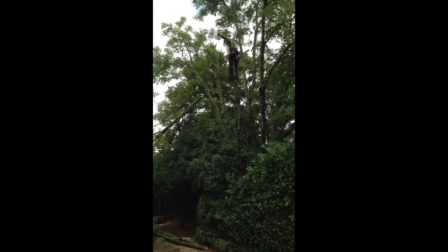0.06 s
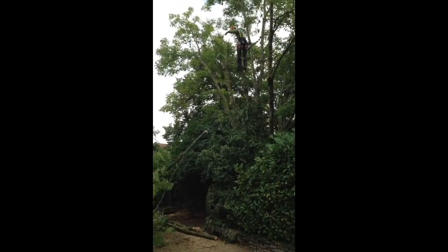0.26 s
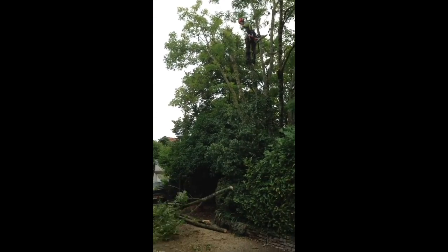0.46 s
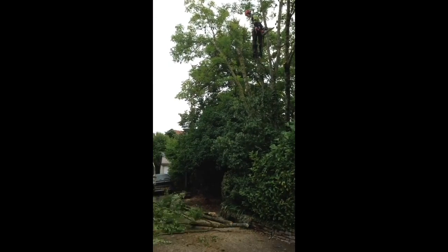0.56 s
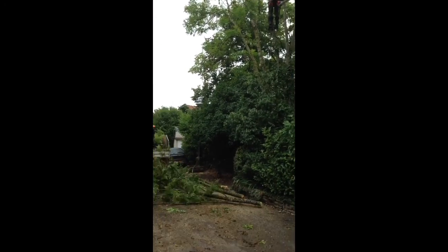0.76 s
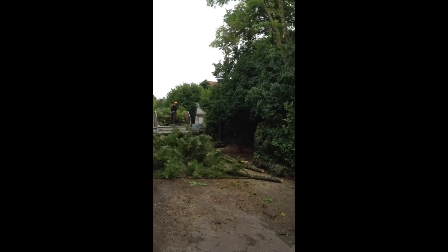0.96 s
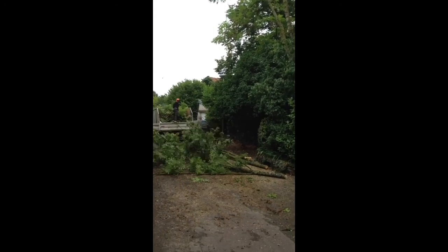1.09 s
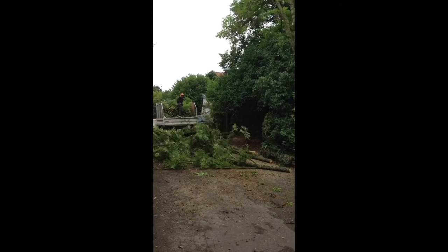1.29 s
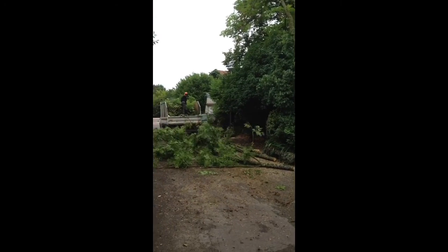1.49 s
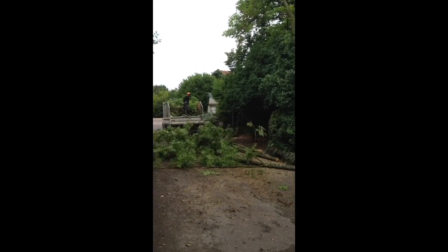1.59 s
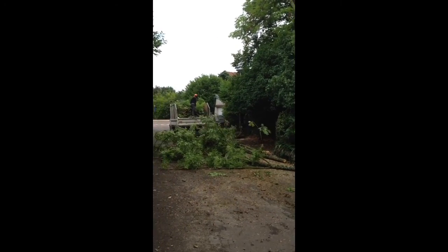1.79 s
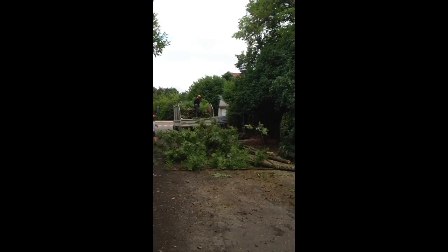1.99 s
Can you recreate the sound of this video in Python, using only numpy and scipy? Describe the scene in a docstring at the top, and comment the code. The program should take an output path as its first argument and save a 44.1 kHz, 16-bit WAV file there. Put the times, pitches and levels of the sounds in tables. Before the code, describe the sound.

Outdoors among trees, a falling branch rushes through leaves with sharp twig snaps and lands with a woody knock and slight echo. The rustle settles, leaving a quiet idling engine and a string of short, faint squeaks.

```python
"""Leaves swish over an idling engine as a cut branch crashes into foliage, a sum of countless tiny impacts.
Twigs fracture with sharp cracks; then the heavy butt strikes the ground, rings in its damped modes,
thuds, rebounds and shakes the leaves again. The engine's periodic firing gives a putter of harmonics,
with hiss and valve clatter, and a run of short raspy squeaks follows the fall.
Trees around the yard scatter the snaps and the landing into a short, faint echo."""
import sys
import numpy as np
from scipy import signal
from scipy.fft import rfft, irfft, next_fast_len
from scipy.io import wavfile
from scipy.ndimage import uniform_filter1d, map_coordinates

SR = 44100
rng = np.random.default_rng(int(sys.argv[2]) if len(sys.argv) > 2 else 0)


def wav_record(signal):
    """Record a signal, one row per channel, as 16-bit PCM in the file named by sys.argv[1]."""
    frames = np.transpose(np.atleast_2d(signal))
    bounded = np.clip(frames, -1, 1)
    # unit amplitude maps onto the largest positive 16-bit level
    quanta = np.round(bounded * 32767).astype(np.int16)
    wavfile.write(sys.argv[1], SR, quanta)


N = 90404

# The branch passing through foliage. Each row: time in seconds, relative leaf and twig levels in dB.
FALL_LEVELS = [(0, -39.5, -52), (.1, -40, -43.5), (.165, -45, -48), (.2, -34, -40), (.24, -31, -39.5),
               (.274, -23.5, -33), (.29, -22.5, -30), (.35, -23, -29), (.39, -22.5, -28),
               (.425, -23.5, -31.5), (.45, -27, -30.5), (.51, -28, -34.5), (.55, -37, -43.5),
               (.62, -38.5, -38.5), (.66, -42.5, -29), (.682, -39, -25.5), (.72, -35.5, -42),
               (.77, -46, -55), (.86, -53, -52), (.97, -52.5, -59), (1.2, -59, -58.5)]
# Spectra of the leaf rustle and the twig clatter. Each row: frequency in Hz, relative level in dB.
LEAF_SPECTRUM = [(300, -45), (1200, -14), (2400, -8), (3800, -2), (6000, -2.5), (8000, -4.5), (11000, -9.5),
                 (15500, -17.5)]
TWIG_SPECTRUM = [(60, -15.5), (200, -12), (450, -2), (850, 0.5), (1350, 0.5), (1900, 0), (3000, -5),
                 (8000, -23.5)]
# The idling speed. Each row: time in seconds, firings per second.
FIRING_RATE = [(0, 50), (.18, 48), (.5, 47.8), (.85, 48.5), (1.02, 49), (1.12, 47.6), (1.35, 46.9),
               (1.5, 48.4), (1.64, 51), (1.75, 51), (1.85, 50.4), (2.05, 49.6)]
# Envelopes of the exhaust and the hiss. Each row: time in seconds, level in dB.
EXHAUST_LEVEL = [(0, -44), (.3, -42), (.58, -44.5), (.72, -53.5), (.9, -51.5), (1.3, -47.5), (1.7, -47),
                 (2.05, -46)]
HISS_LEVEL = [(0, -40.5), (.6, -51), (.85, -52.5), (1.3, -51), (1.7, -48), (2.05, -47.5)]
# The exhaust's harmonic series. Each row: multiple of the firing rate, relative level in dB.
EXHAUST_HARMONICS = [(3, -9), (4, 1.5), (5, -14), (6, -15.5), (7, -6.5), (8, -14.5), (10, -17), (11, -15),
                     (14, -16.5), (17, -15)]
# Spectra of the engine's hiss and rumble. Each row: frequency in Hz, relative level in dB.
HISS_SPECTRUM = [(100, -9), (450, -15.5), (600, -26.5), (720, -23), (1000, -19), (1400, -27), (1950, -20),
                 (2800, -21), (4700, -17), (6700, -29), (11800, -37.5), (15500, -43)]
RUMBLE_SPECTRUM = [(15, -47), (40, -32), (95, -30), (140, 3.5), (200, 5.5), (270, -11), (350, 3),
                   (460, -23), (2000, -70)]
# Modes of valve gear and casing. Each row: frequency in Hz, bandwidth in Hz, relative level in dB.
VALVE_MODES = [(706, 23, -0.5), (890, 30, -8), (2410, 40, 2.5), (2594, 24, 5), (3220, 53, 0), (3565, 45, 1),
               (4260, 760, -11.5)]
# Twigs breaking, and at 0.665 s a knock as the limb lands. Each row: start in seconds, level in dB, centre in
# Hz, 60 dB decay time in seconds.
SNAPS = [(.179, -32, 3330, 0.024), (0.254, -26, 3700, 0.048), (0.2794, -9, 3440, 0.012),
         (0.282, -11, 6200, 0.019), (.3111, -13, 6000, .003), (.3135, -6.5, 5600, 0.006),
         (0.3133, -12.5, 1600, 0.014), (0.3686, -9, 1570, 0.025), (.37, -13.5, 3570, 0.018),
         (0.3725, -8, 7000, 0.0046), (.377, -15, 3000, 0.018), (0.3981, -12.5, 4140, 0.016),
         (0.4093, -13.5, 1320, 0.039), (0.425, -9, 1680, 0.0045), (0.463, -26, 1980, 0.0097),
         (0.6652, -17.5, 1040, 0.0079), (.6718, -23, 2520, 0.014), (0.6802, -18, 3560, 0.034)]
# The butt striking the ground. Each row: start in seconds, strength in dB, contact time in seconds.
BUTT_BLOWS = [(.629, 2, 0.0017), (0.6343, -0.5, 0.00021), (.6353, -1, 0.0011), (.637, 2, 0.00042),
              (.6381, -6.5, .00014), (0.646, -14.5, 0.00024), (0.6663, -10, 0.00086)]
# Modes of the limb. Each row: frequency in Hz, bandwidth in Hz, relative level in dB.
LIMB_MODES = [(180, 36, -15), (340, 82, -11), (630, 80, -3), (684, 36.5, 2.5), (820, 430, 12.5),
              (944, 36, 4), (1056, 56, -3.5), (1230, 40, -1.5), (1374, 13, -5.5), (1830, 63, -6.5),
              (2700, 140, -16), (3220, 42, 2.5), (3380, 80, 2), (3640, 65, 1)]
# The ground taking the weight. Each row: start in seconds, level in dB, frequency in Hz.
GROUND_THUDS = [(.632, -13.5, 120), (.882, -34, 125)]
# Squeaks. Each row: midpoint in seconds, level in dB, peak pitch in Hz, relative overtone level in dB.
SQUEAKS = [(.995, -46, 1980, -16), (1.075, -49, 1980, -12), (1.196, -48, 1890, -17),
           (1.282, -48, 1930, -25), (1.345, -43.5, 2008, -10), (1.45, -40, 2000, -2),
           (1.531, -39.5, 2016, -11), (1.61, -40, 2054, 0.5), (1.686, -45.5, 1940, -12),
           (1.746, -48, 1960, -1), (1.823, -43, 1980, -4), (1.922, -42.5, 1960, -8), (1.98, -41, 1940, -19),
           (2.04, -46, 1940, -16)]
# Spectrum of a squeak's rasp. Each row: frequency in Hz, relative level in dB.
RASP_SPECTRUM = [(200, 0), (650, 4.5), (1400, -34), (2080, 3), (2900, -11.5), (3450, 7), (3900, -16),
                 (4350, 1), (5200, -2), (6300, -13.5), (9000, -8), (15000, -27)]
# Reverberation of the yard. Each row: frequency in Hz, 60 dB decay time in seconds.
YARD_DECAY = [(100, 0.072), (1000, 0.39), (4000, 0.28), (14000, 0.063)]


def amp(db):
    """Amplitude ratio of a level in decibels."""
    return 10 ** (np.asarray(db) / 20)


def unit(x):
    """Normalisation to an rms of 1."""
    return x / np.sqrt(np.mean(x ** 2) + 1e-20)


def along(points, hz):
    """Interpolation of (Hz, value) points on a logarithmic frequency axis."""
    freqs, values = np.transpose(points)
    return np.interp(np.log(hz + 1), np.log(freqs + 1), values)


def curves(rows):
    """Linear interpolation, sample by sample, of each column after the time."""
    times, *columns = np.transpose(rows)
    return [np.interp(np.arange(N) / SR, times, column) for column in columns]


def wobble(rate):
    """Smooth random modulation: a spline through `rate` knots a second."""
    knots = rng.standard_normal(int(N * rate / SR) + 4)
    return map_coordinates(knots, [np.arange(N) * rate / SR])


def filtered(x, response):
    """Linear filtering: the spectrum of x is multiplied by a frequency response."""
    size = next_fast_len(len(x) + 8192)
    return irfft(rfft(x, size) * response(np.fft.rfftfreq(size, 1 / SR)), size)[:len(x)]


def coloured(x, spectrum):
    """Spectral shaping by (Hz, dB) points, at an rms of 1."""
    return unit(filtered(x, lambda f: amp(along(spectrum, f))))


def resonance(f, hz, width):
    """Frequency response of a damped oscillator."""
    return 1j * f * width / (hz * hz - f * f + 1j * f * width)


def ringing(x, modes):
    """Forced vibration: x drives modes of alternating sign, summed to an rms of 1."""
    return unit(filtered(x, lambda f: sum((-1) ** k * amp(db) * resonance(f, hz, width)
                                          for k, (hz, width, db) in enumerate(modes))))


def add(track, start, sound):
    """Superposition of a sound on the track from `start` seconds."""
    part = track[max(round(start * SR), 0):][:len(sound)]
    part += sound[:len(part)]


def contacts(per_second=9800, spread_db=3):
    """Shot noise: tiny independent impacts of random sign and size."""
    impulses = (rng.random(N) < per_second / SR) * rng.choice([-1, 1], N)
    return impulses * amp(spread_db * rng.standard_normal(N))


def foliage(stick_range_hz=(1215, 6190)):
    """Random impacts merge into leaf rustle and twig clatter, and excite resonances in thin sticks."""
    leaf_db, twig_db = curves(FALL_LEVELS)
    pitches = np.exp(rng.uniform(*np.log(stick_range_hz), size=24))
    sticks = unit(filtered(contacts(), lambda f: sum(resonance(f, hz, width=6.1) for hz in pitches)))
    twigs = amp(-2) * coloured(contacts(), TWIG_SPECTRUM) + amp(-7) * sticks
    leaves = amp(-1) * coloured(contacts(), LEAF_SPECTRUM)
    return amp(leaf_db) * leaves + amp(twig_db) * twigs


def hiss_and_valves(firing_phase, lead_cycles=0.24, whine_hz=11640, whine_width_hz=190):
    """Amplitude modulation: hiss and valve clatter swell with each firing, beside a thin whine."""
    level_db, = curves(HISS_LEVEL)
    beat = np.cos(firing_phase + 2 * np.pi * lead_cycles)  # the valves precede the putter
    hiss = coloured(rng.standard_normal(N), HISS_SPECTRUM) * (1 + 0.1 * beat)
    whine = ringing(rng.standard_normal(N), [(whine_hz, whine_width_hz, 0)])
    taps = rng.standard_normal(N) * np.exp(2.5 * beat)  # one burst per firing
    clatter = ringing(taps * amp(wobble(rate=30)), VALVE_MODES)
    return amp(level_db) * (hiss + amp(-8) * clatter + amp(-21) * whine)


def exhaust(firing_phase, flutter_db=.9, flutter_rad=.18, pipe_lag_rad=.05):
    """Periodic pulses form a harmonic series: a slightly fluttering putter over a low rumble."""
    level_db, = curves(EXHAUST_LEVEL)
    putter = np.zeros(N)
    for k, db in EXHAUST_HARMONICS:
        gain = amp(db + flutter_db * wobble(rate=30))
        putter += gain * np.cos(k * firing_phase - pipe_lag_rad * k * k + flutter_rad * wobble(rate=30))
    rumble = amp(-9) * coloured(rng.standard_normal(N), RUMBLE_SPECTRUM)
    return amp(level_db) * (unit(putter) + rumble)


def engine(cylinders=4, lope_rad=.15):
    """Phase modulation: unequal cylinders make the idle lope, with valves and exhaust in step."""
    rate, = curves(FIRING_RATE)
    even_phase = 2 * np.pi * np.cumsum(rate) / SR
    firing_phase = even_phase + lope_rad * np.sin(even_phase / cylinders)
    return hiss_and_valves(firing_phase) + exhaust(firing_phase)


def snaps(relative_width=.8, attack_s=.0002):
    """Fracture: one sharp crack and a burst of tearing fibres excite each twig's broad resonance; the knock as
    the limb lands is made the same way."""
    out, t = np.zeros(N), np.arange(SR // 10) / SR
    for start, db, hz, t60 in SNAPS:
        twig = lambda f: resonance(f, hz, relative_width * hz)
        envelope = amp(-60 * t / t60) * (1 - np.exp(-t / attack_s))
        fibres = unit(filtered(rng.standard_normal(len(t)), twig)) * envelope
        crack = filtered(signal.unit_impulse(len(t)), twig)
        add(out, start, amp(db) * (fibres + amp(-0.5) * crack / np.abs(crack).max()))
    return out


def landing(crunch_t60_s=0.0084, push_s=0.00029, bark_hz=7500, thud_t60_s=.045):
    """Impact excitation: each blow rings the limb, crunches grit and pushes the air; the ground thuds."""
    out, t = np.zeros(N), np.arange(SR // 4) / SR
    for start, db, contact_s in BUTT_BLOWS:
        ring = np.zeros(len(t))
        for k, (hz, width, mode_db) in enumerate(LIMB_MODES):
            gain = (-1) ** k * amp(mode_db + rng.normal(0, 1))
            ring += gain * np.exp(-np.pi * width * t) * np.sin(2 * np.pi * hz * t)
        crunch = rng.standard_normal(len(t)) * amp(-60 * t / crunch_t60_s)
        push = t / push_s * (2 - t / push_s) * np.exp(-t / push_s)
        blow = amp(-21) * ring + crunch + amp(-3) * push
        # Longer contacts are duller, and the bark cushions the top of the treble.
        cushion = lambda f: 1 / (1 + 2j * f * contact_s) / (1 + 1j * f / bark_hz)
        add(out, start, amp(db) * filtered(blow, cushion))
    for start, db, hz in GROUND_THUDS:
        add(out, start, amp(db - 60 * t / thud_t60_s) * np.sin(2 * np.pi * hz * t))
    return out


def squeaks(tone_half_s=.006, rasp_half_s=0.0093, pitch_arch=0.0388, waver_rad=.45, overtone_ratio=2.19):
    """Friction: rubbing gives an unsteady tone that arches up and down inside a dry, resonant rasp."""
    out, t = np.zeros(N), np.arange(-SR // 20, SR // 20) / SR
    tone_swell = np.exp(-(t / tone_half_s) ** 4)
    rasp_swell = np.exp(-(t / rasp_half_s) ** 4)
    for middle, db, hz, overtone_db in SQUEAKS:
        waver = unit(uniform_filter1d(rng.standard_normal(len(t)), size=60))
        pitch = hz * (1 + pitch_arch * (tone_swell - 1))
        phase = 2 * np.pi * np.cumsum(pitch) / SR + waver_rad * waver
        tone = np.sin(phase) + amp(overtone_db) * np.sin(overtone_ratio * phase)
        rasp = amp(-4.5) * coloured(rng.standard_normal(len(t)), RASP_SPECTRUM)
        add(out, middle + t[0], amp(db) * (tone_swell * tone + rasp_swell * rasp))
    return out


def air(x, cutoff_hz=9600):
    """Absorption in air: cracks lose their highest frequencies."""
    return filtered(x, lambda f: 1 / np.sqrt(1 + (f / cutoff_hz) ** 6))


def yard_echo(x):
    """Scattering: the trees return a diffuse tail in which each frequency decays at its own rate."""
    hz, t, spectrum = signal.stft(rng.standard_normal(SR // 2), SR, nperseg=256)
    decay = amp(-60 * t / along(YARD_DECAY, hz)[:, None])
    _, tail = signal.istft(spectrum * decay, SR, nperseg=256)
    return signal.fftconvolve(x, tail / np.linalg.norm(tail))[:N]


def scene():
    """Superposition: the falling branch, its echo, the engine and the squeaks add in one channel."""
    cracks, blows = air(snaps()), air(landing())
    # The landing's knocks echo more faintly than the twig cracks.
    echo = yard_echo(amp(-7) * cracks + amp(-13.5) * blows)
    return (cracks + blows + echo + foliage() + engine() + squeaks())[None]


def record(dry):
    """Band limiting: the microphone thins the deep bass and passes nothing above its upper limit."""
    low_cut_hz, top_hz = 60, 15500
    return np.array([filtered(x, lambda f: 1j * f / (low_cut_hz + 1j * f) * (f < top_hz)) for x in dry])


dry = scene()
out = record(dry)
wav_record(out)
```